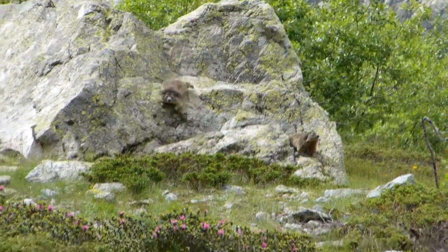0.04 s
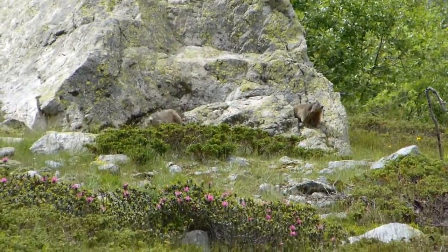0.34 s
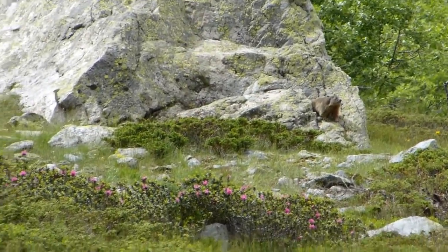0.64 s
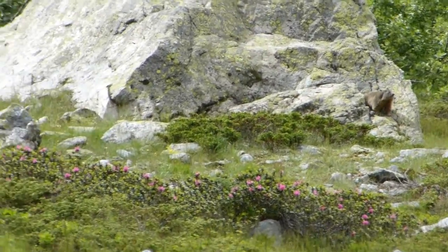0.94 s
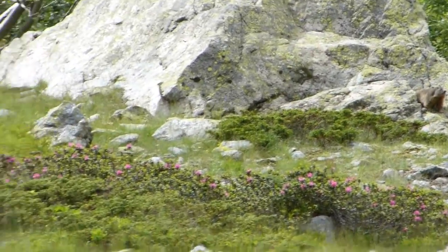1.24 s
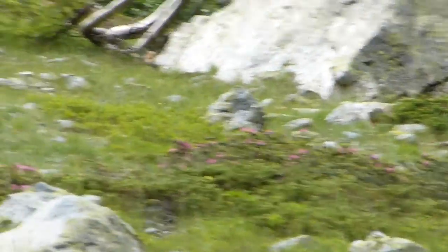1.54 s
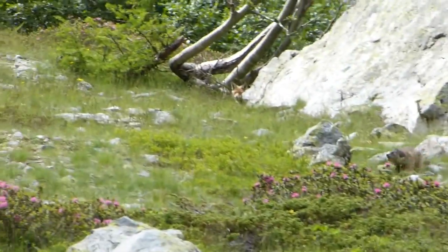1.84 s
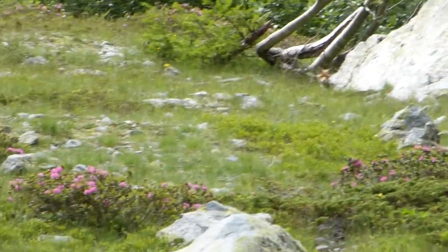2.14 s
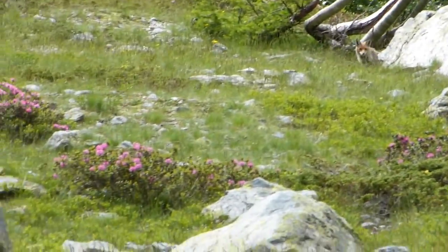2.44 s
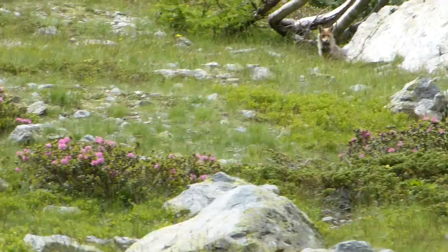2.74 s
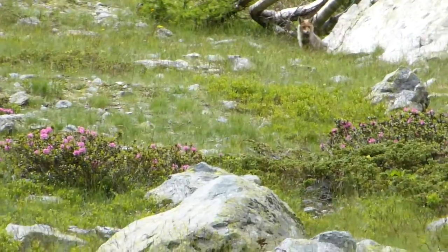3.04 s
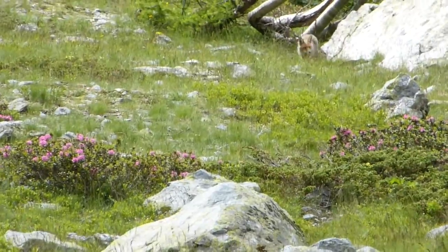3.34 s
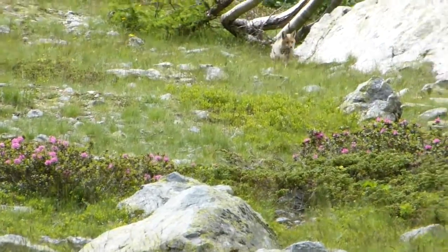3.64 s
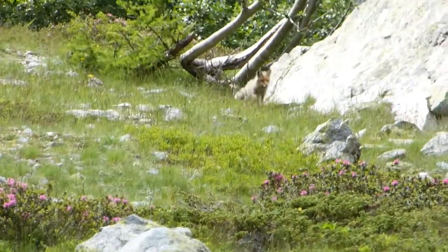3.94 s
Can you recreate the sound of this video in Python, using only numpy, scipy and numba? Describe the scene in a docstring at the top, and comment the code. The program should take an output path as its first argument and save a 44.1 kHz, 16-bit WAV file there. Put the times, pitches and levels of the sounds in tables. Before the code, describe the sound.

A marmot whistles five sharp, high alarm calls at uneven intervals, each echoing briefly off the rocks of an open mountain meadow. A distant stream rushes steadily behind, dipping slightly under each call.

```python
"""Five sharp alarm whistles of a marmot ring out over the steady rush of a distant stream.
Each starts with a rasp, sweeps up, arches over and falls: a harmonic source filtered by the throat.
Boulders and slopes of the mountain meadow scatter it back; a far bird adds one faint note.
The recorder's gain control ducks the stream under every call and lets it swell again."""
import sys
import numpy as np
from scipy import signal
from scipy.fft import rfft, irfft
from scipy.io import wavfile
from scipy.ndimage import uniform_filter1d, minimum_filter1d
from numba import njit

SR = 44100
rng = np.random.default_rng(int(sys.argv[2]) if len(sys.argv) > 2 else 0)


def output_pcm(signal):
    """Save a mono or channel-first signal as 16-bit PCM at the path in sys.argv[1].

    Samples are clipped to [-1, 1] before scaling.
    """
    pcm = np.clip(np.atleast_2d(signal).T, -1, 1) * 32767
    wavfile.write(sys.argv[1], SR, np.round(pcm).astype(np.int16))


N = 176400


def whistle(start, crest, fall, end, top_hz, squareness, db):
    """Source and filter: the harmonics of an arched pitch sweep pass through the throat's resonances."""
    # response of throat and mouth (frequency [Hz], gain [dB])
    throat = [(1000, -80.5), (1600, -26.5), (2050, -25.5), (2400, -15.5), (3000, -10), (3500, -4),
              (3800, -4.5), (4200, -12), (4550, -9), (4850, -3), (5300, -15), (5750, -10.5), (6450, -24),
              (7100, -11.5), (7900, -26.5), (8600, -39.5), (9500, -53), (10600, -41), (14300, -42.5),
              (16000, -75)]
    # harmonics 2 to 5 at the source (level relative to the fundamental [dB])
    overtones = [-13.5, -23.5, -23, -37]
    start_hz, fall_hz, end_hz = 1229, 3016, 2110
    rise_s, step_s, attack_s, release_s = .021, .0066, .015, .013
    t = np.arange(N) / SR
    on = (t >= start) & (t < end + release_s)
    t = t[on]
    age = t - start

    # the upsweep climbs in small steps
    stepped = abs(age + .9 * step_s / (2 * np.pi) * np.sin(2 * np.pi * age / step_s))
    below_top = np.exp(-(stepped / rise_s) ** 1.7)
    arch = np.clip((t - crest) / (fall - crest), 0, 1) ** squareness
    drop = 1 - (1 - np.clip((t - fall) / (end - fall), 0, 1)) ** 1.1
    drop += np.maximum(t - end, 0) / (end - fall) / 2  # still sinking during the release
    hz = top_hz - (top_hz - start_hz) * below_top - (top_hz - fall_hz) * arch - (fall_hz - end_hz) * drop
    rasp = np.exp(-(age / .036) ** 2)
    hz *= 1 + (.0045 + .012 * rasp) * wander(700)[on]  # jitter, strongest at the onset

    phase = 2 * np.pi * np.cumsum(hz) / SR
    flare = undb(11.5 * np.exp(-((age - .02) / .0057) ** 2))  # overtones flare in the first push
    tone = gain_at(hz, throat) * np.sin(phase)
    for k, overtone_db in enumerate(overtones, 2):
        tone += flare * undb(overtone_db) * gain_at(k * hz, throat) * np.sin(k * phase)
    breath = (undb(-32.5) * rasp + undb(-38)) * noise(throat)[on]

    # pressure builds, then fades from crest to end
    build_db = -17.5 * np.maximum(1 - age / attack_s, 0)
    fade_db = -6.5 * np.clip((t - crest) / (end - crest), 0, 1)
    shimmer_db = .4 * wander(250)[on]
    gate = np.clip(age / .002, 0, 1) * np.clip((end + release_s - t) / (2 * release_s), 0, 1)
    out = np.zeros(N)
    out[on] = (tone + breath) * gate * undb(9.5 + db + build_db + fade_db + shimmer_db)
    return out


def marmot():
    """Superposition of five whistles, each with its own pitch contour and strength."""
    # (start [s], crest [s], final fall [s], end [s], top pitch [Hz], arch exponent [-], level [dB])
    calls = [(.9195, .988, 1.065, 1.108, 3550, 2.6, -4), (1.4105, 1.465, 1.514, 1.548, 3595, 2.0, .5),
             (1.9595, 2.02, 2.089, 2.135, 3600, 2.0, 0), (2.858, 2.918, 2.983, 3.025, 3570, 1.9, -1),
             (3.7885, 3.842, 3.95, 3.999, 3560, 1.8, -3.5)]
    return sum(whistle(*call) for call in calls)


def direct_path(call):
    """Localisation: level and phase differences between two microphone ports give the direction."""
    # (frequency [Hz], left minus right level [dB])
    level_difference = [(2400, 3), (3100, 2.5), (3600, 0), (4800, 0.2), (7000, -4.5)]
    # (frequency [Hz], phase lead of the left port [rad])
    phase_difference = [(3500, 0.23), (4800, 0.4), (6300, -1), (6800, 1.5), (7300, 2.7), (7800, -5.5)]
    hz = np.fft.rfftfreq(2 * N, 1 / SR)
    lead = np.interp(hz, *np.array(phase_difference).T)
    left = np.sqrt(gain_at(hz, level_difference)) * np.exp(.5j * lead)
    return irfft(rfft(call, 2 * N) * np.array([left, 1 / left]))[:, :N]


def reflections(call):
    """Convolution with the meadow's impulse response: near rocks and slope, far valley and rock faces."""
    # echoes from rock faces (delay [s], spread [s], level [dB])
    faces = [(0.308, 0.012, -39), (0.612, 0.057, -41)]
    t = np.arange(N) / SR

    def decay(db, t60):
        """Exponential decay of power, by 60 dB in t60 seconds; db sets the total energy."""
        return undb(db - 60 * t / t60) ** 2 * 2 * np.log(1000) / t60

    def scatter(power, top_hz):
        """Diffuse reflection: noise follows a power envelope, dulled by absorption in the air."""
        mid, side = rng.standard_normal((2, N))
        air = signal.butter(4, top_hz, fs=SR, output="sos")
        return signal.sosfilt(air, stereo(mid, .16 * side) * np.sqrt(power / SR)) * pan(-1.6)

    echoes = sum(undb(db) ** 2 * np.exp(-((t - delay) / spread) ** 2) / (spread * np.sqrt(np.pi))
                 for delay, spread, db in faces)
    slope_build_s, rock_decay_s = .026, .008
    build = 1 - np.exp(-(t / slope_build_s) ** 2)
    slope = scatter(decay(db=-14, t60=.38) * build, top_hz=7000)
    valley = scatter(decay(db=-27, t60=1.86) + echoes, top_hz=3980)
    rock_envelope = np.exp(-t / rock_decay_s) * np.sqrt(2 / (rock_decay_s * SR))
    rocks = undb(-23) * rng.standard_normal(N) * rock_envelope
    return signal.fftconvolve(call[None], slope + valley + rocks, axes=1)[:, :N]


def bird():
    """A linear chirp: one short, slightly falling note from a distant bird."""
    centre_s, length_s, hz, sag_hz_per_s = 3.672, .06, 4720, 2500
    t = np.arange(N) / SR - centre_s
    swell = np.cos(np.pi * np.clip(t / length_s, -.5, .5))
    return undb(-46.5) * swell * np.sin(2 * np.pi * (hz - sag_hz_per_s * t / 2) * t)


def stream():
    """Rushing water as amplitude-modulated noise: octave bands swell together and flicker alone."""
    # spectrum of the water (frequency [Hz], relative density [dB])
    rush = [(20, -52.5), (75, -26.5), (140, -15), (369, -10), (600, -3), (950, -4.5), (1510, -10.5),
            (2070, -16.5), (2900, -25), (3700, -24), (4800, -22.5), (5500, -31), (6400, -39.5), (8700, -39),
            (15500, -51.5)]
    # stereo width (frequency [Hz], side minus mid level [dB])
    width = [(100, -25.5), (380, -8), (1300, -14.5), (4400, -11), (8100, 2.5), (15000, -29)]
    hz = np.fft.rfftfreq(N, 1 / SR)
    spectrum = stereo(rfft(noise(rush)), rfft(noise(rush)) * gain_at(hz, width))
    octave = np.log2(np.clip(hz, 64, 16384))
    swell_db = -.7 * wander(3)
    out = 0
    for centre in range(6, 15):
        band = irfft(spectrum * np.maximum(1 - abs(octave - centre), 0), N)
        flicker_db = 1.85 * wander(17)
        out += band * undb(swell_db + flicker_db)
    return out * undb(-39.5) * pan(-2)


def hiss():
    """Self-noise of the recorder, partly correlated between the channels."""
    # (frequency [Hz], relative density [dB])
    floor = [(20, -3), (60, -12.5), (200, -26), (1000, -16), (15000, -38.5)]
    return undb(-67.5) * stereo(noise(floor), .5 * noise(floor))


def undb(db):
    """Decibels to amplitude ratio."""
    return 10 ** (np.asarray(db) / 20)


def unit(x):
    """Normalisation to rms 1."""
    return x / np.sqrt(np.mean(x ** 2))


def gain_at(hz, points):
    """Interpolation of (frequency [Hz], level [dB]) points on a log axis, as a gain."""
    f, db = np.array(points, float).T
    return undb(np.interp(np.log(np.maximum(hz, 1)), np.log(f), db))


def noise(points):
    """Spectral shaping of white noise, at rms 1."""
    white = rfft(rng.standard_normal(N))
    return unit(irfft(white * gain_at(np.fft.rfftfreq(N, 1 / SR), points), N))


def wander(rate):
    """Random modulation of rms 1: rate steps a second, smoothed twice."""
    hold = int(SR / rate)
    steps = np.repeat(rng.standard_normal(N)[:N // hold + 1], hold)
    return unit(uniform_filter1d(uniform_filter1d(steps, hold), hold)[:N])


def pan(db):
    """Amplitude panning: two gains for a left minus right level difference."""
    return undb(np.array([[db], [-db]]) / 2)


def stereo(mid, side):
    """Sum and difference of mid and side give left and right."""
    return np.array([mid + side, mid - side])


@njit
def follow(x, attack_s, release_s):
    """First-order envelope follower with separate rise and fall times."""
    out, level = np.empty(len(x)), 0.
    for i in range(len(x)):
        level += (x[i] - level) / (SR * (attack_s if x[i] > level else release_s))
        out[i] = level
    return out


def scene():
    """Superposition: marmot and bird arrive directly and by reflection, over the stream."""
    water = stream()
    calls = marmot() + bird()
    return direct_path(calls) + reflections(calls) + water


def record(dry):
    """Automatic gain control clamps fast and recovers in two stages; hiss and a low-pass follow."""
    threshold_db, top_hz = -11, 15550
    peak = -minimum_filter1d(-abs(dry).max(axis=0), size=32)
    excess_db = np.maximum(20 * np.log10(peak + 1e-9) - threshold_db, 0)
    slow_db = .38 * follow(excess_db, attack_s=.3, release_s=12)
    fast_db = follow(np.maximum(excess_db - slow_db, 0), attack_s=.0056, release_s=.13)
    low_pass = signal.ellip(10, .2, 70, top_hz, fs=SR, output="sos")
    return signal.sosfilt(low_pass, dry * undb(-slow_db - fast_db) + hiss())


dry = scene()
out = record(dry)
output_pcm(out)
```